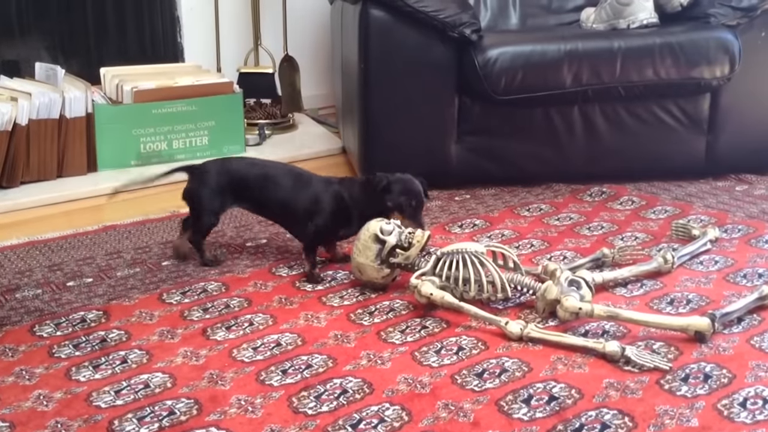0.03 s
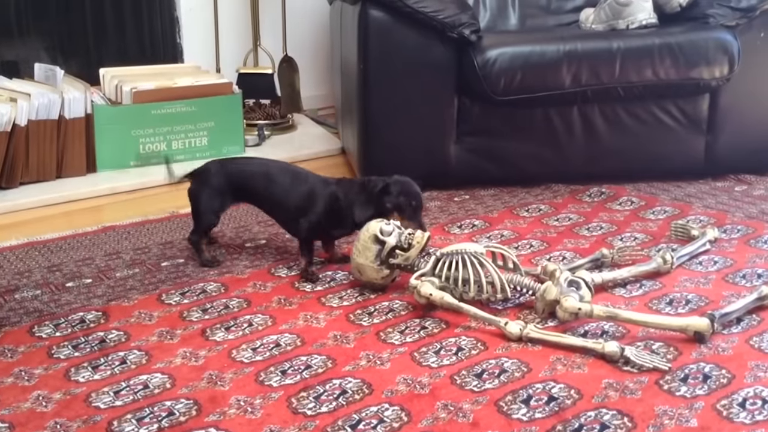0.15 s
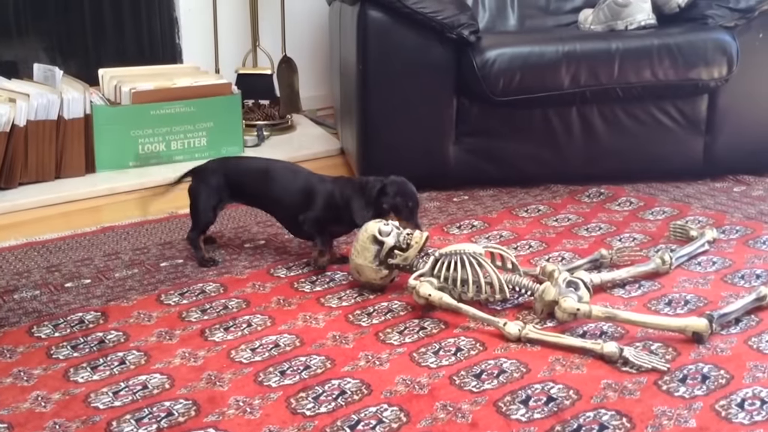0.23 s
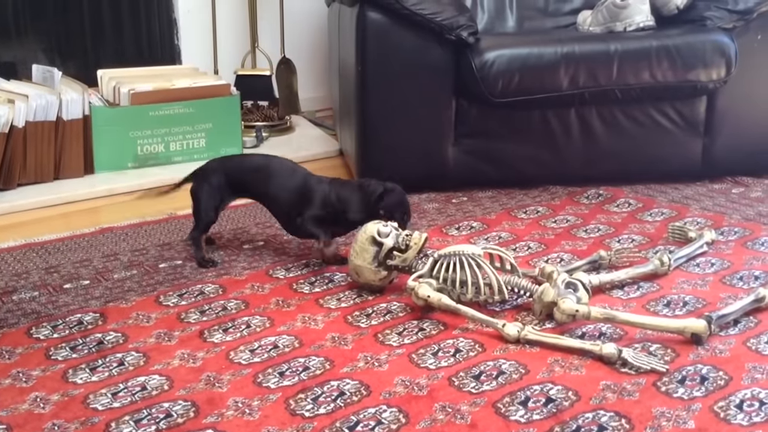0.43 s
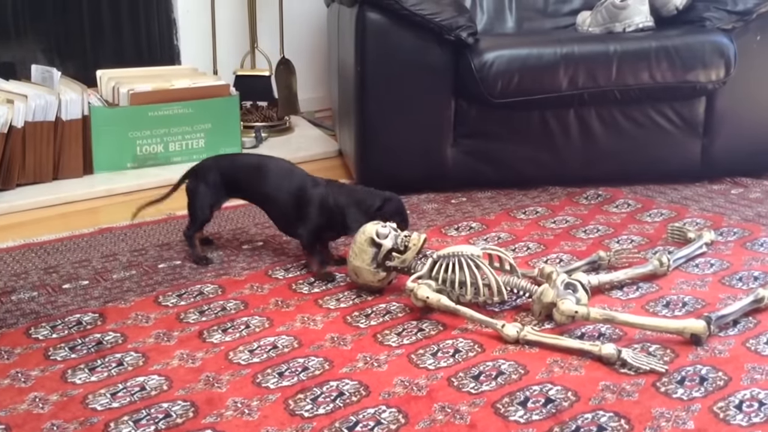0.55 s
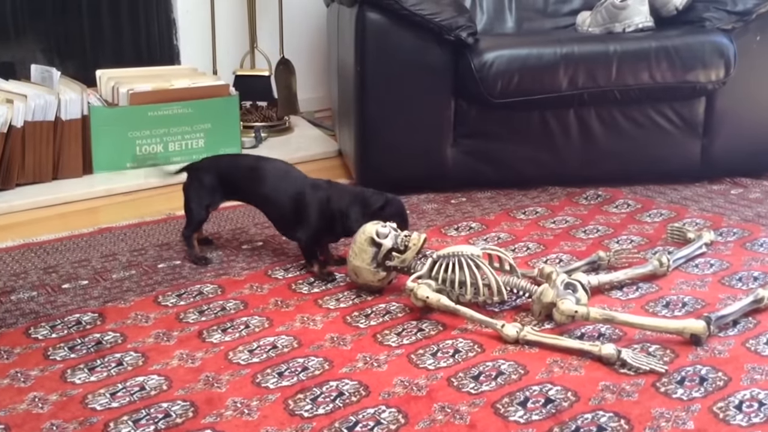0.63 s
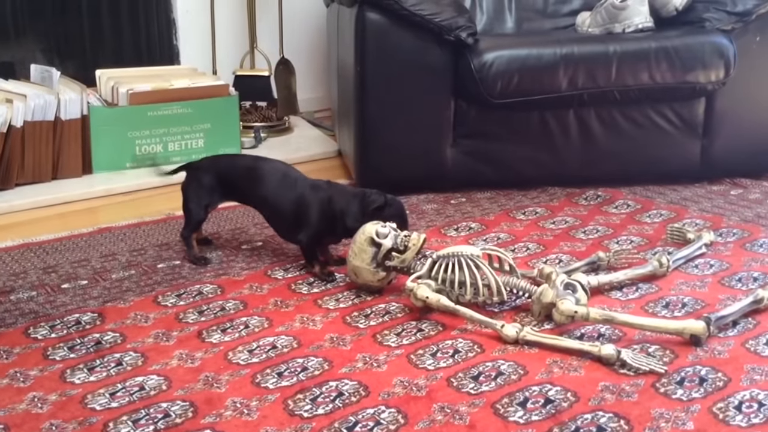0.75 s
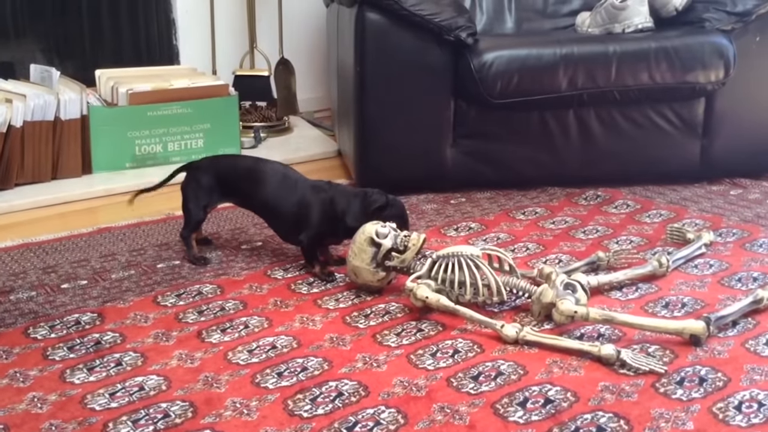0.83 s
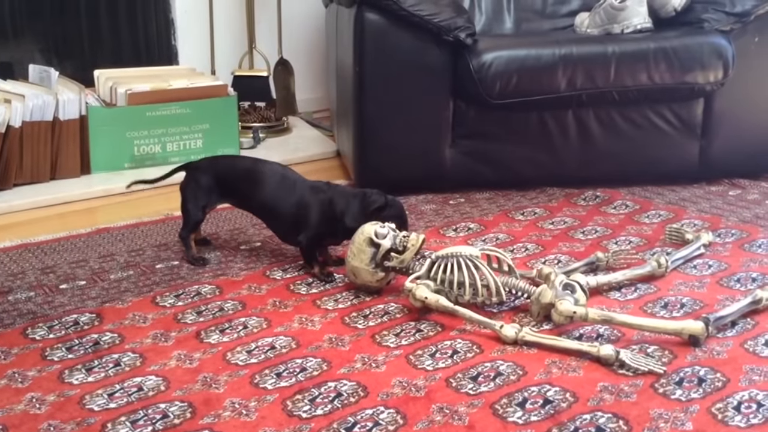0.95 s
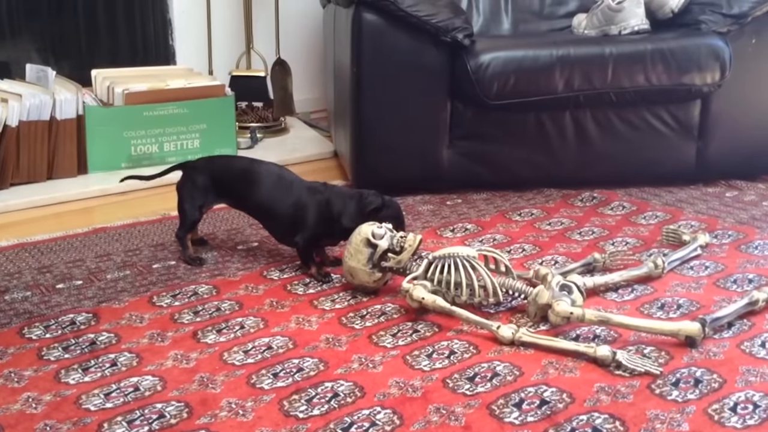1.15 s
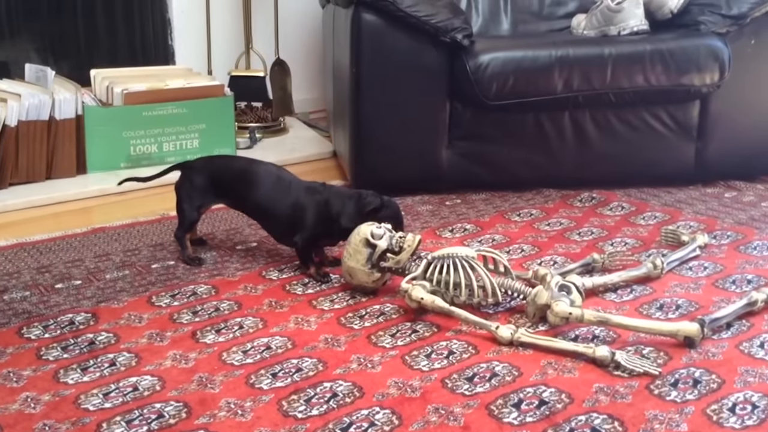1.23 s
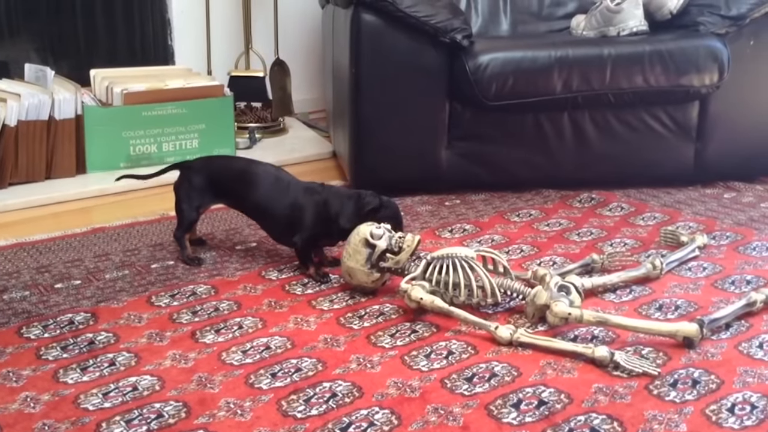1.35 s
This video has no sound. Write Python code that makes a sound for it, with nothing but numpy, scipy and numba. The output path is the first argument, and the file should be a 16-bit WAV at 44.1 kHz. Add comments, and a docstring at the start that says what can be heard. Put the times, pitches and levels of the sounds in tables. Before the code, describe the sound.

A small dog gives two loud, high alarm yelps close together, each followed by a low grunt. A few soft knocks and a faint rustle come at the end. The microphone is far enough away to hear the living room ring.

```python
"""A small dog's bark dies away in a live living room, then two loud alarm yelps follow close together.
Each arches up in pitch and breaks into a rough fall, with a low grunt after it: the vocal folds
sound through the mouth while air rasps in the throat and hisses at the teeth. A few soft knocks and
a faint rustle come at the end. One microphone, far enough off to hear the room ring on;
the recorder's limiter flattens the barks."""
import sys
import numpy as np
from scipy import signal
from scipy.fft import rfft, irfft
from scipy.io import wavfile
from scipy.ndimage import uniform_filter1d, minimum_filter1d
from numba import njit

SR = 44100
rng = np.random.default_rng(int(sys.argv[2]) if len(sys.argv) > 2 else 0)


def waveform_to_disk(signal):
    """Save audio, clipped to [-1, 1], as 16-bit WAV at the path in sys.argv[1]."""
    frames = np.transpose(np.atleast_2d(signal))
    scaled = np.clip(frames, -1, 1) * 32767
    samples = np.round(scaled).astype(np.int16)
    wavfile.write(sys.argv[1], SR, samples)


N = 61739
LEAD = int(.3 * SR)  # time before zero, so the room already rings with the early bark
T = np.arange(-LEAD, N) / SR

# vocal folds in each bark (time [s], pitch [Hz], level [dB], roughness [0-1])
EARLY_VOICE = [(-.2, 765.7, -11, .25), (-.16, 817.5, 9, 0.23), (-.09, 822, -1.5, 0.4),
               (-.03, 796, -44, 0.7)]
FIRST_VOICE = [(.182, 486.9, -28.5, 0.084), (.197, 575, -1.5, 0.09), (.214, 741.6, 8.5, 0.13),
               (.226, 888, 6, 0.46), (.243, 858.3, 2, 0.88), (.258, 888.2, 7, .3),
               (.304, 891.8, 12.5, 0.39), (.317, 651.7, -14, 0.68), (.338, 550.5, -5.5, 0.24),
               (.36, 384, -27, 0.61), (.39, 367, -41.5, 0.57)]
SECOND_VOICE = [(.52, 559, -8.5, 0.14), (.535, 618.5, -7, 0.098), (.541, 995.7, 11, 0.066),
                (.547, 1056, 10, 0.058), (.556, 1295, 11.5, 0.11), (.566, 1530, 7.5, 0.25),
                (.573, 1032, 7, 0.27), (.584, 889, 9, 0.11), (.607, 847.7, 8.5, 0.32),
                (.622, 778.2, 4.5, .36), (.65, 735.4, 2, 0.26), (.666, 535.7, -9, 0.32),
                (.69, 413.5, -17, .6), (.74, 344.7, -26.5, 0.59)]
# air through the open jaws (time [s], level [dB])
EARLY_BREATH = [(-.2, -16), (-.14, -1), (-.04, -27)]
FIRST_BREATH = [(.185, -34), (.21, 1), (0.242, 5.5), (0.267, 5), (.3, -38), (.34, -27), (.38, -31.5)]
SECOND_BREATH = [(0.521, -21.5), (0.547, -12), (0.576, -4), (0.618, 1.5), (.66, -28), (0.712, -29)]
# sharp mouth resonance that gives each bark its bite (time [s], centre [Hz], level [dB])
EARLY_BITE = [(-.1, 2490, -8.5)]
FIRST_BITE = [(0.211, 3020, -3.5), (.236, 3012, -4), (0.245, 2688, 1), (0.274, 2760, -25.5)]
SECOND_BITE = [(0.552, 2204, -31.5), (0.584, 2550, -13), (.63, 2634, -15)]
# throat and mouth shaping the harmonics, jaws wide or half closed (frequency [Hz], gain [dB])
WIDE_FORMANTS = [(250, -24), (400, 7), (600, -3.5), (880, 1.5), (1300, -3), (1550, -4), (1850, -19.5),
                 (2200, -16.5), (3050, -13.5), (3450, -21.5), (4400, -36.5), (5500, -41)]
NARROW_FORMANTS = [(250, 8), (400, 1.5), (620, 1.5), (780, 6), (1450, -7), (1750, -16), (2150, -18),
                   (2550, -26.5), (3250, -25.5), (4200, -39.5), (5500, -51)]
# hiss at the teeth, jaws wide or half closed (frequency [Hz], level [dB])
WIDE_TEETH = [(1500, -18.5), (2400, -7), (3000, 14), (3600, 2.5), (5400, -7), (7350, -2.5), (8120, 13),
              (9000, -0.5), (10800, 0.5), (15500, -9)]
NARROW_TEETH = [(1500, -7), (3000, 8.5), (3750, 9.5), (4400, 16), (5100, -0.5), (7000, 9), (8500, 8.5),
                (12000, 0.5), (15500, -5)]
# rasp of the throat (frequency [Hz], level [dB])
RASP_SPECTRUM = [(200, -60.5), (400, -33), (650, -11.5), (1000, 13), (1600, 0.5), (2100, 8.5), (2700, 1),
                 (3400, -10.5), (4400, -11), (5400, -40), (15000, -48.5)]
# closed-mouth grunts, one curve each (time [s], pitch [Hz], level [dB])
GRUNT_CURVES = [
    [(.364, 208.9, -55), (.382, 186.3, -37), (.42, 142.6, -45.5), (.465, 157.4, -48.5),
     (.495, 168.5, -42.5), (.518, 207.5, -32.5), (.53, 201.6, -59)],
    [(.73, 190.6, -80), (.755, 177.5, -47.5), (.79, 177, -84), (.83, 176.3, -71), (.9, 166, -66)],
]
# soft knocks (time [s], thud level [dB], tick level [dB])
KNOCK_HITS = [(1.2435, -42, -49.5), (1.2554, -34, -45), (1.27, -33.5, -41), (1.2824, -34, -51)]
# modes of a knock's thud (frequency [Hz], level [dB], t60 [s])
THUD_MODES = [(196.2, -9, 0.0227), (315, 4.5, 0.02), (408, -13.5, 0.035)]
# tick of a knock (frequency [Hz], level [dB])
TICK_SPECTRUM = [(300, -12), (1050, 31), (1600, -5), (2300, 3), (3800, -23), (9000, -42)]
# swell of the rustle (time [s], level [dB])
RUSTLE_LEVELS = [(1.271, -69), (1.306, -57.5), (1.335, -62.5), (1.41, -62)]
# colour of the rustle (frequency [Hz], level [dB])
RUSTLE_SPECTRUM = [(130, -20), (320, 19), (600, 11), (1100, 14), (3900, -3.5), (5200, 4), (7000, -5.5)]
# living-room reverberation (band centre [Hz], t60 [s], level [dB])
REVERB_BANDS = [(146, 0.24, -6.5), (376, 0.43, -3.5), (838, 0.64, -10), (1880, 0.56, 2.5), (2800, 0.61, -7),
                (4400, 0.58, -5.5), (7400, 0.54, -5.5), (15100, 0.28, 4.5)]
# room modes that stand out of the reverberation (frequency [Hz], level [dB])
STANDING_WAVES = [(713, -27.5), (770, -30.5), (810, -29.5), (874, -24), (1084, -25)]
# room tone at the microphone (frequency [Hz], level [dB])
ROOM_TONE_SPECTRUM = [(60, -15.5), (200, 2.5), (400, 1), (1000, -16), (2500, -13.5), (5000, -16.5),
                      (15000, -18.5)]


def bark(voice, breath, bite_curve, formants, teeth):
    """Unsteady vocal folds sound through the mouth; air rasps once a cycle and hisses at the teeth."""
    jitter, shimmer, half_tone, wobble_hz = .075, .69, .11, 236.5
    rasp_db, bite_air_db, hiss_db, bark_db = -5, 23, -16.5, -16
    times, hz, db, roughness = np.array(voice).T
    rough = np.clip(np.interp(T, times, roughness), 0, 1)
    pitch = np.interp(T, times, hz)
    phase = 2 * np.pi * np.cumsum(pitch * (1 + jitter * rough * wobble(wobble_hz))) / SR
    tone = sum(undb(level_at(k * pitch, formants)) * np.sin(k * phase) for k in range(1, 8))
    tone *= 1 + rough * (shimmer * wobble(wobble_hz) + half_tone * np.sin(phase / 2))
    puffs = rough * (1 + .39 * np.cos(phase))  # air pulses with the folds
    rasp = undb(rasp_db) * puffs * noise(RASP_SPECTRUM)
    buzz = sum(np.sin(k * phase) for k in range(2, 8))
    air = undb(bite_air_db) * puffs * rng.standard_normal(len(T))
    bite = mouth_ring(buzz + air, bite_curve)
    hiss = undb(hiss_db) * swell(*np.array(breath).T) * noise(teeth)
    at_muzzle = swell(times, db) * (tone + rasp + bite) + hiss
    return undb(bark_db) * high_pass(at_muzzle, hz=298, order=8)  # a small muzzle radiates little bass


def mouth_ring(drive, curve, width_hz=145, upper_ratio=1.66, upper_db=-19):
    """Two sharp mouth resonances slide together with the jaw."""
    times, hz, db = np.array(curve).T
    centre = np.interp(T, times, hz)
    lower, upper = (resonate(resonate(drive, f, width_hz), f, width_hz)
                    for f in (centre, centre * upper_ratio))
    return undb(np.interp(T, times, db)) * (lower + undb(upper_db) * upper)


def grunt(curve, jitter=.045, overtone_step_db=-4):
    """The dog's closed mouth gives a low, unsteady hum with two weaker overtones."""
    times, hz, db = np.array(curve).T
    pitch = np.interp(T, times, hz) * (1 + jitter * wobble(hz=130))
    phase = 2 * np.pi * np.cumsum(pitch) / SR
    hum = sum(undb(overtone_step_db * k) * np.sin((k + 1) * phase) for k in range(3))
    return swell(times, db) * hum


def knocks(thud_rise_s=.0018, tick_rise_s=.00056, tick_decay_s=.0038):
    """Light contacts, each a dull, damped thud and a short tick."""
    hits, grain = 0, noise(TICK_SPECTRUM)
    for start, thud_db, tick_db in KNOCK_HITS:
        age = np.maximum(T - start, 0)
        ring = sum(undb(db - 60 * age / t60) * np.sin(2 * np.pi * hz * age)
                   for hz, db, t60 in THUD_MODES)
        thud = ring * (1 - np.exp(-age / thud_rise_s))
        tick = grain * (1 - np.exp(-age / tick_rise_s)) * np.exp(-age / tick_decay_s)
        hits += undb(thud_db) * thud + undb(tick_db) * tick
    return high_pass(hits, hz=136, order=2)


def rustle():
    """A faint swell of noise trails the knocks."""
    return swell(*np.array(RUSTLE_LEVELS).T) * noise(RUSTLE_SPECTRUM)


def wall_echoes(x, first_echo_s=.0037, build_s=.0035):
    """Dense echoes reach the microphone just behind the direct sound and die away band by band."""
    t = np.arange(SR) / SR
    log_hz = np.log(np.fft.rfftfreq(SR, 1 / SR) + 1)
    log_centres = np.log([row[0] for row in REVERB_BANDS])
    echoes, tail = rfft(rng.standard_normal(SR)), 0
    build = np.clip((t - first_echo_s) / build_s, 0, 1)
    for share, (_, t60, db) in zip(np.eye(len(REVERB_BANDS)), REVERB_BANDS):
        band = irfft(echoes * np.interp(log_hz, log_centres, share), SR)
        fade = build * undb(-60 * t / t60)
        tail += undb(db) * fade / np.linalg.norm(fade) * band
    return signal.fftconvolve(x, tail)[:len(x)]


def room_modes(x, t60_s=.5):
    """A few standing waves ring on after each bark."""
    t = np.arange(SR) / SR
    fade = undb(-60 * t / t60_s)
    ring = sum(undb(db) * np.cos(2 * np.pi * hz * t) for hz, db in STANDING_WAVES)
    return signal.fftconvolve(x, ring * fade / np.linalg.norm(fade))[:len(x)]


def room_tone(level_db=-66):
    """Faint, steady noise lies under everything."""
    return undb(level_db) * noise(ROOM_TONE_SPECTRUM)


def undb(db):
    """Decibels to gain."""
    return 10 ** (np.asarray(db) / 20)


def unit_rms(x):
    """Scale to rms 1."""
    return x / np.sqrt(np.mean(x ** 2))


def level_at(hz, spectrum):
    """Read a table's level along a log-frequency axis."""
    centres, db = np.array(spectrum).T
    return np.interp(np.log(hz + 1), np.log(centres), db)


def noise(spectrum):
    """Noise of rms 1 with a given spectral shape."""
    colour = undb(level_at(np.fft.rfftfreq(len(T), 1 / SR), spectrum))
    return unit_rms(irfft(rfft(rng.standard_normal(len(T))) * colour, len(T)))


def wobble(hz):
    """Smooth random motion at a given rate."""
    span = max(int(SR / hz), 2)
    return unit_rms(uniform_filter1d(uniform_filter1d(rng.standard_normal(len(T)), span), span))


def swell(times, db):
    """Gain along a level curve, silent outside it."""
    sounding = (T > times[0]) & (T < times[-1])
    return uniform_filter1d(undb(np.interp(T, times, db)) * sounding, size=90)


def high_pass(x, hz, order):
    """Remove the bass."""
    return signal.sosfilt(signal.butter(order, hz, "high", fs=SR, output="sos"), x)


@njit
def resonate(x, hz, width_hz):
    """Band-pass with a moving centre, gain 1 at the peak."""
    out, band_state, low_state = np.empty(len(x)), 0., 0.
    for i in range(len(x)):
        tuning, damping = np.tan(np.pi * hz[i] / SR), width_hz / hz[i]
        band = (band_state + tuning * (x[i] - low_state)) / (1 + tuning * (tuning + damping))
        band_state = 2 * band - band_state
        low_state += 2 * tuning * band
        out[i] = damping * band
    return out


@njit
def follow_peaks(x, release_s):
    """Envelope that jumps up at once and falls back slowly."""
    fall = 1 - np.exp(-1 / (release_s * SR))
    out, peak = np.empty(len(x)), 0.
    for i in range(len(x)):
        peak = max(x[i], peak + (x[i] - peak) * fall)
        out[i] = peak
    return out


def scene():
    """At the microphone: dog, knocks and rustle direct, then the room's ring and its faint tone."""
    dog = (bark(EARLY_VOICE, EARLY_BREATH, EARLY_BITE, NARROW_FORMANTS, NARROW_TEETH)
           + bark(FIRST_VOICE, FIRST_BREATH, FIRST_BITE, WIDE_FORMANTS, WIDE_TEETH)
           + bark(SECOND_VOICE, SECOND_BREATH, SECOND_BITE, NARROW_FORMANTS, NARROW_TEETH)
           + sum(grunt(curve) for curve in GRUNT_CURVES))
    taps = knocks()
    direct = dog + taps + rustle()
    room = room_modes(dog) + wall_echoes(undb(2) * dog + undb(-3) * taps)
    return (direct + room + room_tone())[None, LEAD:]


def record(dry):
    """The recorder's fast limiter looks a little ahead and holds the barks down; the top is cut."""
    limit_db, look_ahead_s, top_hz = -3.1, .0008, 15200
    peak = follow_peaks(np.abs(dry[0]), release_s=.015)
    needed_gain = 1 / np.maximum(peak / undb(limit_db), 1)
    span = int(look_ahead_s * SR)
    gain = uniform_filter1d(minimum_filter1d(needed_gain, span), span)
    low_pass = signal.ellip(10, .2, 80, top_hz, fs=SR, output="sos")
    return signal.sosfilt(low_pass, dry * gain)


dry = scene()
out = record(dry)
waveform_to_disk(out)
```